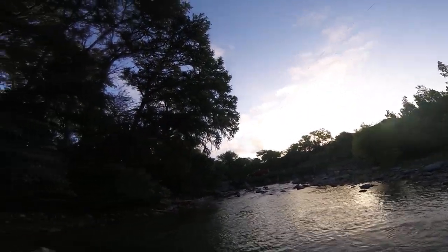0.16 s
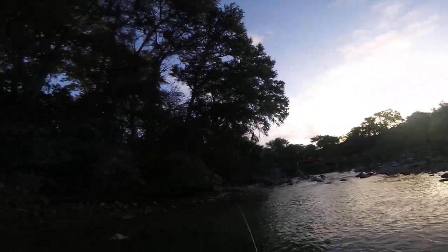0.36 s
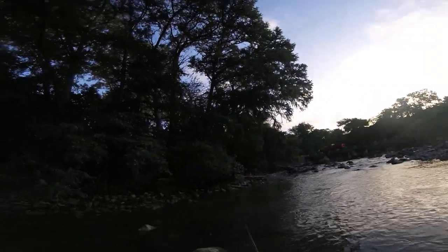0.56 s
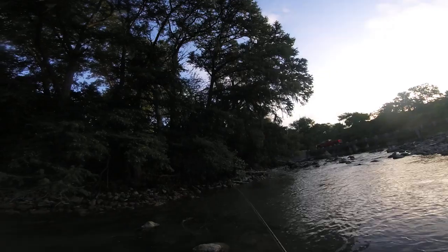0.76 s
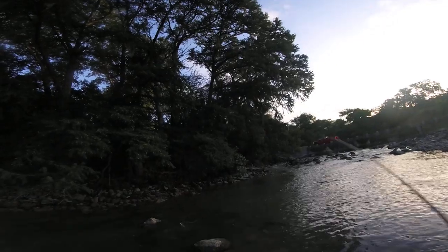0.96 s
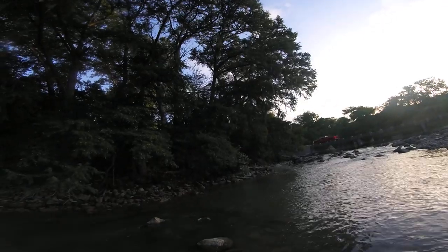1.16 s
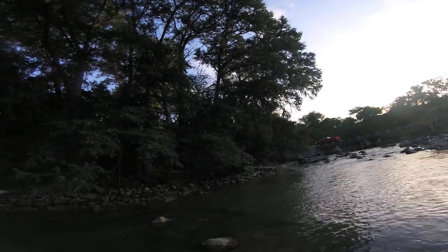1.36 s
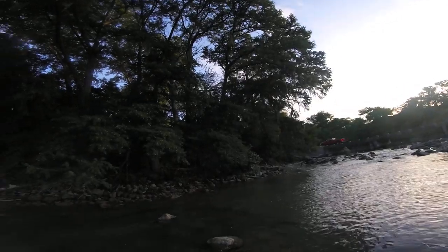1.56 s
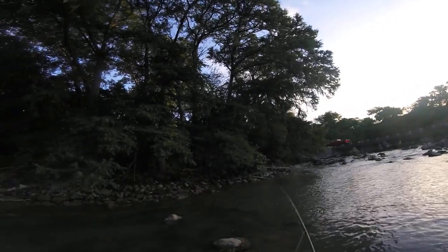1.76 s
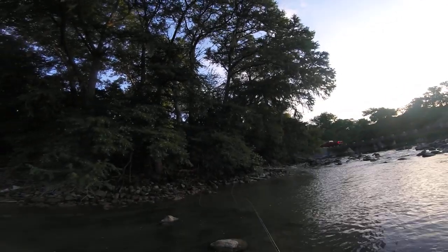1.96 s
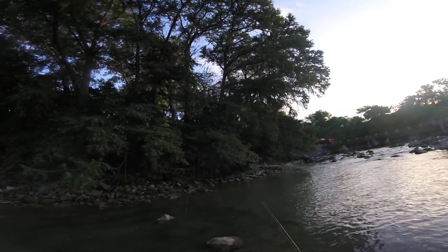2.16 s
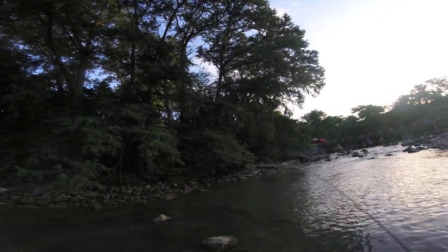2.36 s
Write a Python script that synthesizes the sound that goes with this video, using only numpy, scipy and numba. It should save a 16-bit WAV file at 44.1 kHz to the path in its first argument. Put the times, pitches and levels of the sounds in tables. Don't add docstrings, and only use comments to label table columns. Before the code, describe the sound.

Fly rod casting beside a river: short airy whistling swishes and sharp line clicks over soft rapids

```python
import sys
import numpy as np
from scipy import signal
from scipy.io import wavfile
from scipy.ndimage import uniform_filter1d
from numba import njit

SR = 44100
rng = np.random.default_rng(int(sys.argv[2]) if len(sys.argv) > 2 else 0)


def digitize_waveform(pressure):
    field = np.atleast_2d(pressure).T
    bounded = np.clip(field, -1, 1)
    quanta = np.round(bounded * 32767).astype(np.int16)
    wavfile.write(sys.argv[1], SR, quanta)


def undo_db(level):
    steps = np.asarray(level, float) / 20
    return 10 ** steps


N = 105840


@njit
def svf(x, hz, width):
    y = np.empty(len(x))
    band_state, low_state = 0., 0.
    for i in range(len(x)):
        g = np.tan(np.pi * hz[i] / SR)
        damping = width[i] / hz[i]
        v = (band_state + g * (x[i] - low_state)) / (1 + g * (g + damping))
        band_state = 2 * v - band_state
        low_state = low_state + 2 * g * v
        y[i] = damping * v
    return y


def band(x, hz, width):
    one = np.ones(len(x))
    return svf(x + 1e-18, np.clip(hz * one, 10, .45 * SR), width * one)


def noise(hz, width):
    once = band(rng.standard_normal(N), hz, width)
    return band(once, hz, width) / np.sqrt(np.pi * width / 2 / SR)


def walk(rate):
    k = int(SR / rate)
    held = np.repeat(rng.standard_normal(N // k + 1), k)
    v = uniform_filter1d(uniform_filter1d(held, k), k)[:N]
    return v / v.std()


def rapids():
    # (frequency [Hz], density [dB per Hz])
    water_spectrum = [(60, -7), (125, -7), (160, -14.5), (200, -10), (400, -15), (1050, -17), (1500, -19.5),
                      (9000, -35.5)]
    level_db, swell_db, flicker_db = -46.5, .4, .92
    out, swell = 0, walk(1.71)
    spectrum_hz, spectrum_db = np.array(water_spectrum).T
    for hz in 25 * 2 ** (np.arange(28) / 3):
        db = np.interp(np.log(hz), np.log(spectrum_hz), spectrum_db)
        db = db + swell_db * swell + flicker_db * walk(9.34)
        out = out + undo_db(db) * np.sqrt(hz) * noise(hz, hz / 3)
    return undo_db(level_db) * out / out.std()


def bubbles():
    per_s, level_db, centre_hz = 60, -51.5, 912
    out, u = np.zeros(N), np.arange(1024) / SR
    draws = rng.random((300, 3))
    for when, size, loud in draws[:int(per_s * N / SR)]:
        hz = centre_hz * 2 ** (2.4 * size - 1)
        i = int(when * (N - 1024))
        ring = np.exp(-u * hz / 4) * np.sin(2 * np.pi * hz * u * (1 + u * hz / 60))
        out[i:i + 1024] += undo_db(level_db + 6.5 * loud) * ring
    return out


def air_rumble(t):
    # (time [s], level [dB])
    rumble_levels = [(0, -54), (.33, -46.5), (.93, -53.5), (1.15, -53.5), (1.4, -53), (1.82, -45),
                     (2.1, -54.5), (2.4, -55.5)]
    s, db = np.array(rumble_levels).T
    low = noise(40, 14)
    power = uniform_filter1d(low ** 2, int(.06 * SR))
    low = low / (power + 0.102) ** 0.38
    return undo_db(np.interp(t, s, db) + 3) * low


def far_drone(t):
    # (frequency [Hz], width [Hz], level [dB])
    drone_hums = [(125.3, 24, -57), (185.9, 22, -57), (252.1, 18, -61)]
    fade_db_per_s = -4
    out = 0
    for hz, width, db in drone_hums:
        out = out + undo_db(db + fade_db_per_s * t + 0.72 * walk(4.2)) * noise(hz, width)
    return out


def ticks():
    # (time [s], peak [dB], centre [Hz], rattle [dB], width [share of centre])
    guide_ticks = [(.146, -38, 4000, -18, .7), (.213, -39, 4600, -20, .7), (.441, -25, 7400, -18, .5),
                   (.4587, -17, 7600, -15, .6), (0.4662, -15, 6000, -22, 0.54),
                   (0.4763, -16, 6200, -20, .9), (0.4771, -23.5, 4500, -11.5, .8),
                   (.481, -31, 5500, -12, .6), (.483, -31, 6500, -14, .5), (.49, -32, 4500, -14, 1.3),
                   (0.492, -36, 4200, -14, .5), (.501, -32, 4500, -14, 1.3), (.5035, -33, 3220, -16, 0.71),
                   (.509, -33.5, 4800, -13, .4), (.535, -38, 4000, -10, .8), (.58, -35, 3300, -10, 0.61),
                   (1.097, -36, 4200, -18, .7), (1.2122, -37, 5300, -16, .6),
                   (1.2286, -32.5, 5470, -16, .8), (1.2615, -34, 5100, -24, 0.34),
                   (1.264, -31, 6000, -24, 1.4), (1.2662, -24, 10000, -16, 1.6),
                   (1.2785, -32, 5000, -12, 0.43), (1.2816, -16, 6200, -20, 1.5),
                   (1.2846, -13, 6000, -22, 1.5), (1.6965, -37, 6200, -20, .7),
                   (1.7035, -37, 6600, -19, .8), (1.712, -37, 6300, -16, .5), (1.723, -37, 5300, -12, .4),
                   (1.7665, -33, 6500, -18, .6), (1.791, -36, 7800, -20, .7), (1.8153, -33, 5800, -16, .7),
                   (.639, -37, 1400, -20, .7), (1.593, -37, 1390, -17, .7), (.852, -42, 5600, -20, .3),
                   (.8566, -31, 5250, -25, .3), (.872, -42, 5000, -18, .5), (1.3335, -34, 6400, -20, .4)]
    t60_s, level_db = .016, -3.5
    out, u = np.zeros(N + 1024), np.arange(1024) / SR
    decay = np.exp(-np.log(1000) * u / t60_s)
    for s, db, hz, rattle_db, share in guide_ticks:
        pulse = u == 0
        hit = undo_db(rattle_db) * rng.standard_normal(1024) * decay + pulse
        hit = band(band(hit, hz, share * hz), hz, share * hz)
        i = int(s * SR)
        out[i:i + 1024] += undo_db(db + level_db) * hit / np.abs(hit).max()
    return out[:N]


def line(t):
    # (peak time [s], rise [s], fall [s], level [dB], centre [Hz])
    line_hisses = [(0.25, .05, 0.054, -57, 4900), (.34, .025, 0.053, -58, 8000),
                   (0.469, 0.032, 0.029, -47, 6300), (.455, 0.0044, .006, -41, 5700),
                   (.453, .004, 0.0034, -47, 8000), (.409, 0.0045, 0.0072, -46, 4200),
                   (.42, .01, 0.011, -45.5, 3400), (.47, .004, .006, -43, 4400),
                   (0.456, 0.047, .09, -50, 3370), (0.433, .03, 0.067, -54, 2000),
                   (.55, .04, .05, -58.5, 6000), (1.103, 0.063, 0.033, -57, 5800),
                   (1.154, 0.027, 0.054, -49, 5200), (1.18, 0.024, .025, -56, 6400),
                   (1.276, .004, .003, -51, 7700), (1.76, .004, .004, -48, 6000),
                   (1.737, .004, 0.0027, -52, 6800), (1.2672, 0.0013, .002, -38, 4000),
                   (1.2665, .001, .002, -30, 12500), (1.3338, .001, .0014, -45, 6000),
                   (1.27, .004, .02, -57, 700), (1.284, 0.0025, 0.003, -34, 5600),
                   (1.283, 0.0045, 0.0048, -42.5, 2100), (1.3, .02, 0.019, -49, 3400),
                   (1.293, .0025, 0.0015, -44, 6700), (1.303, .008, 0.0077, -42, 5500),
                   (1.72, 0.03, 0.04, -57.5, 5200), (1.762, 0.017, .025, -55, 7500),
                   (1.83, 0.025, 0.07, -53, 3000), (1.94, 0.035, .03, -61, 6700),
                   (1.268, .003, .004, -45, 1400), (1.287, 0.022, 0.024, -44, 11500),
                   (1.752, 0.0086, .01, -50, 10500)]
    width_share, grain_db = 0.57, 2.5
    out = 0
    for s, rise, fall, db, hz in line_hisses:
        shape = np.exp(-((t - s) / np.where(t < s, rise, fall)) ** 2)
        out = out + undo_db(db + grain_db * walk(700)) * shape * noise(hz, width_share * hz)
    return out


def rod(t):
    # (time [s], shedding pitch [Hz], level [dB])
    rod_strokes = [
        [(.4, 3400, -57), (.413, 3604, -37.5), (.42, 4300, -36.5), (.4218, 4750, -27), (.434, 4800, -25.5),
         (.444, 4850, -31), (.449, 5200, -33), (.453, 5500, -42), (.458, 5600, -62)],
        [(1.731, 3800, -60), (1.737, 3640, -42), (1.741, 4200, -50), (1.7445, 4630, -37), (1.7478, 4700, -58),
         (1.7505, 4900, -36), (1.7525, 4900, -52), (1.7545, 4900, -44), (1.759, 5200, -64)],
        [(1.815, 3500, -68), (1.826, 3980, -53), (1.831, 4480, -60), (1.835, 4850, -49), (1.841, 5000, -66)],
    ]
    lock_hz = 4300
    wobble_share, wobble_per_s, flutter_db = .022, 900, 1.5
    twin_pitch, twin_db = 1.045, -8.5
    wake_pitch, wake_share = .97, 0.52
    wake_db, ragged_db, octave_db = -14.5, 14, -28.5
    out = 0
    for stroke in rod_strokes:
        s, hz, db = np.array(stroke).T
        pitch = np.interp(t, s, hz)
        gain = undo_db(np.interp(t, s, db, left=-150, right=-150))
        ragged = 1 / (1 + (pitch / lock_hz) ** 16)
        wander = wobble_share * (1 + 4 * ragged) * walk(wobble_per_s)
        phase = 2 * np.pi * np.cumsum(pitch * (1 + wander)) / SR
        tone = np.sin(phase) + undo_db(twin_db) * np.sin(twin_pitch * phase)
        tone = np.sqrt(2) * undo_db(flutter_db * walk(500) - 4.7 * ragged) * tone
        wake = undo_db(wake_db + ragged_db * ragged) * noise(wake_pitch * pitch, wake_share * pitch)
        octave = undo_db(octave_db) * noise(2 * pitch, wake_share * pitch / 2)
        out = out + gain * (tone + wake + octave)
    return out


def scene():
    t = np.arange(N) / SR
    water = rapids() + bubbles()
    air = air_rumble(t) + far_drone(t)
    return (water + air + ticks() + line(t) + rod(t))[None]


def case(x):
    # (frequency [Hz], width [Hz], lift [dB])
    cavity_modes = [(4380, 1470, -3.5), (4850, 400, 4), (5500, 1070, 4.5), (6500, 284, 7.5)]
    out = x + sum((undo_db(db) - 1) * band(x, hz, width) for hz, width, db in cavity_modes)
    return signal.sosfilt(signal.butter(8, 9250, fs=SR, output="sos"), out)


def self_noise():
    return undo_db(-74) * noise(12100, 12100 / 2)


def top_cut(x):
    return signal.sosfilt(signal.butter(12, 14370, fs=SR, output="sos"), x)


def record(dry):
    x = case(dry[0]) + self_noise()
    x = signal.sosfilt(signal.butter(16, 13350, fs=SR, output="sos"), x)
    return top_cut(x[None])


dry = scene()
out = record(dry)
digitize_waveform(out)
```